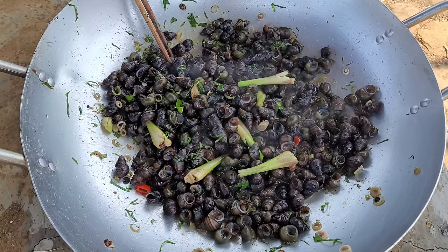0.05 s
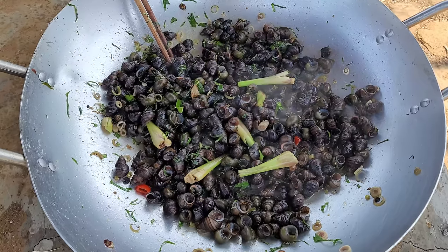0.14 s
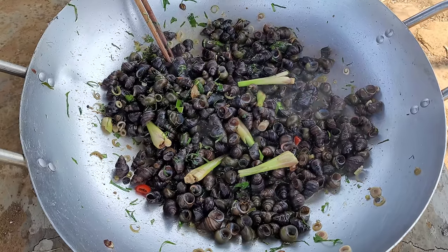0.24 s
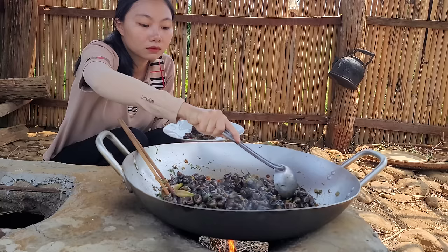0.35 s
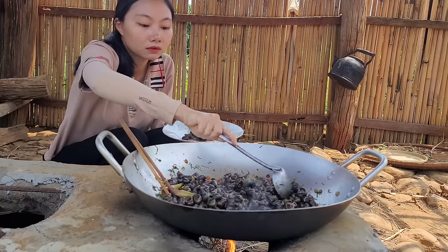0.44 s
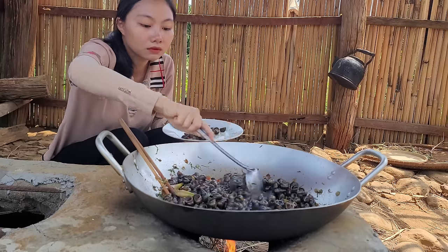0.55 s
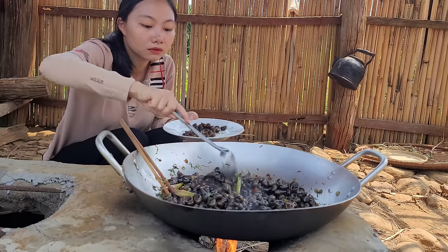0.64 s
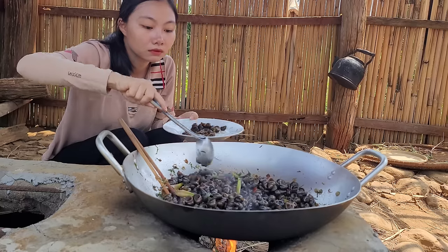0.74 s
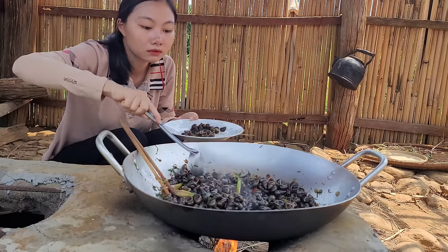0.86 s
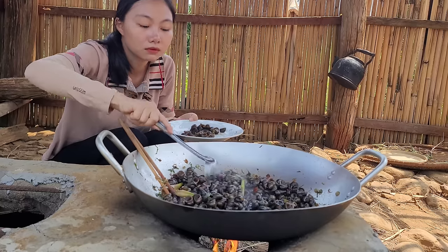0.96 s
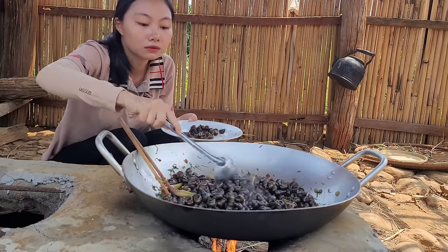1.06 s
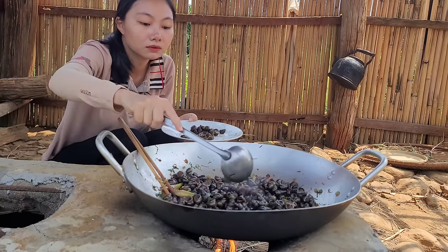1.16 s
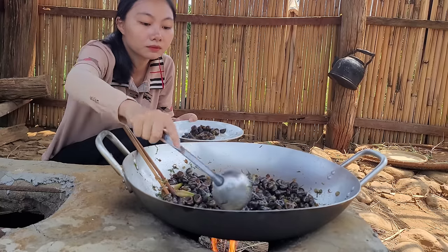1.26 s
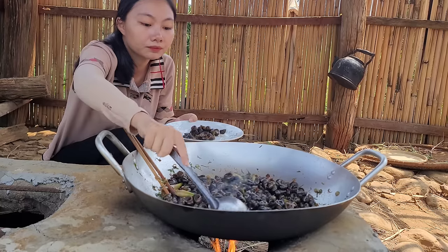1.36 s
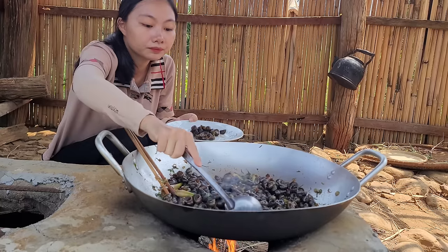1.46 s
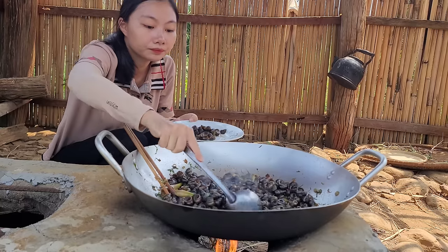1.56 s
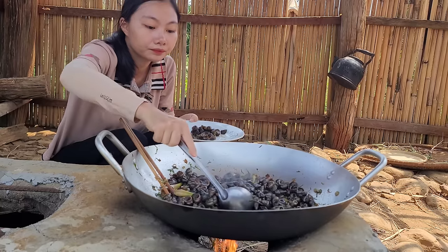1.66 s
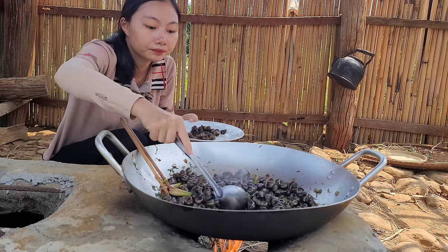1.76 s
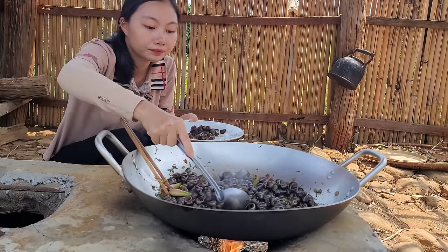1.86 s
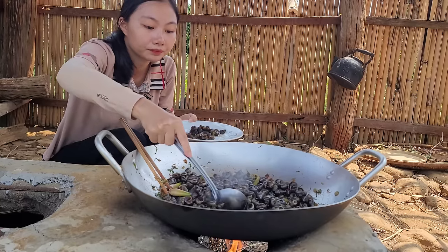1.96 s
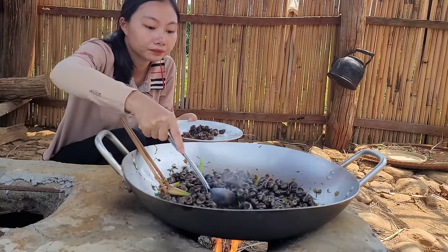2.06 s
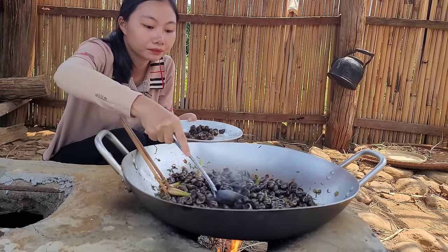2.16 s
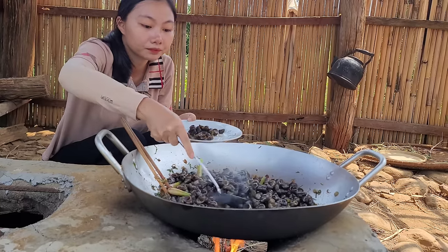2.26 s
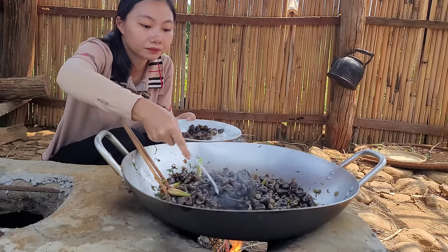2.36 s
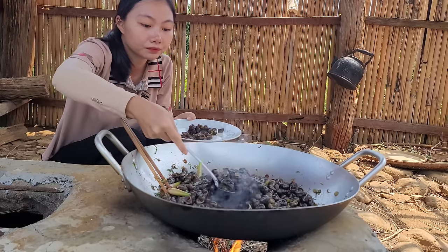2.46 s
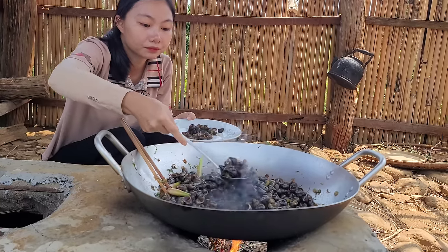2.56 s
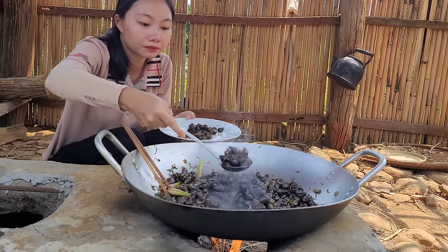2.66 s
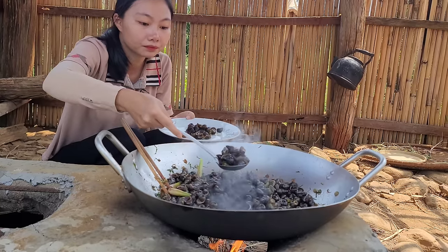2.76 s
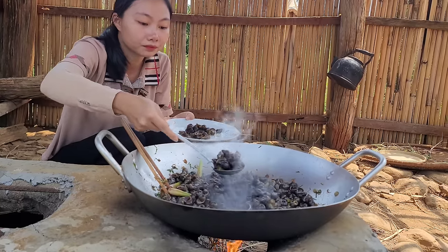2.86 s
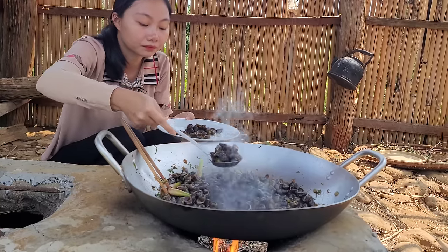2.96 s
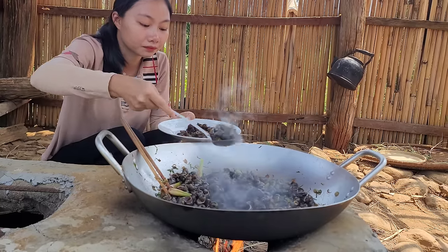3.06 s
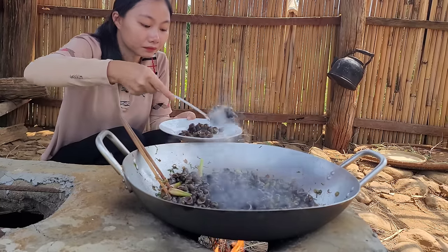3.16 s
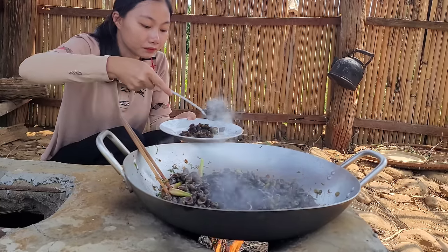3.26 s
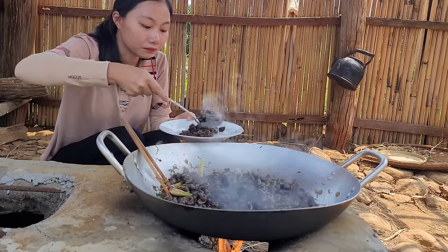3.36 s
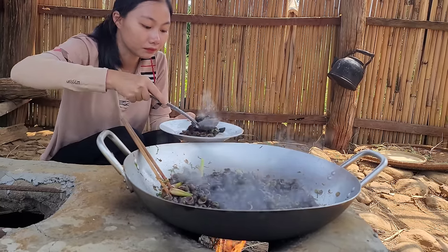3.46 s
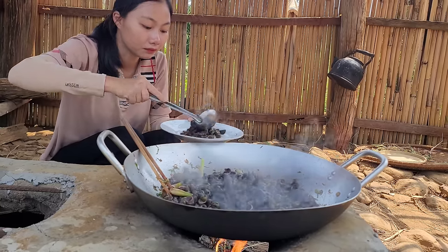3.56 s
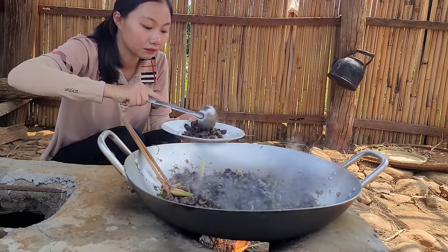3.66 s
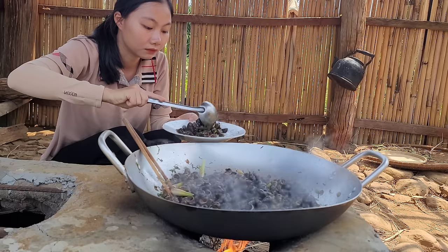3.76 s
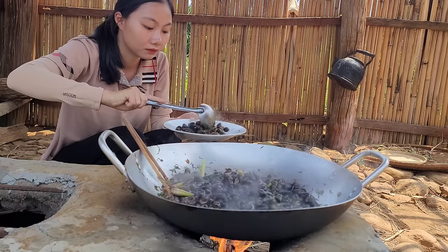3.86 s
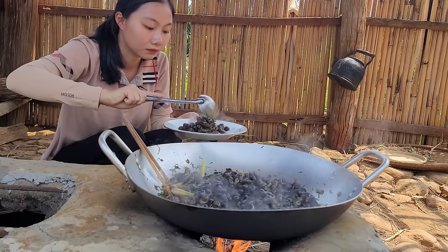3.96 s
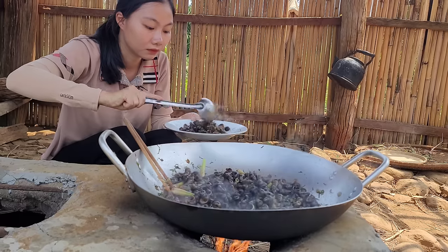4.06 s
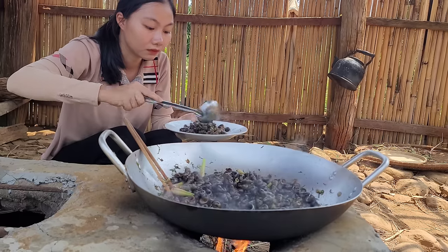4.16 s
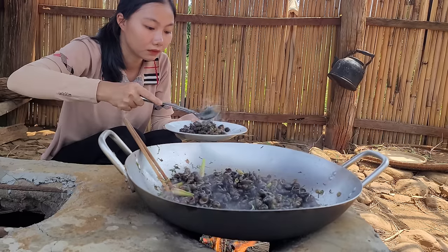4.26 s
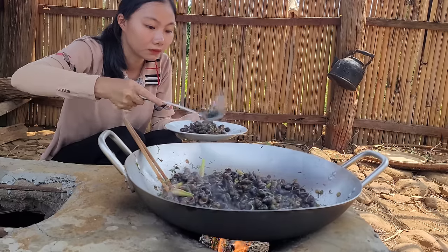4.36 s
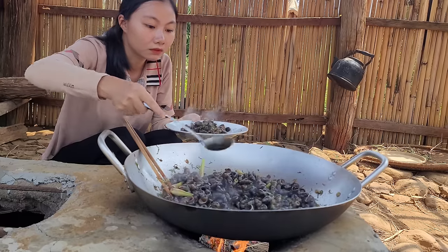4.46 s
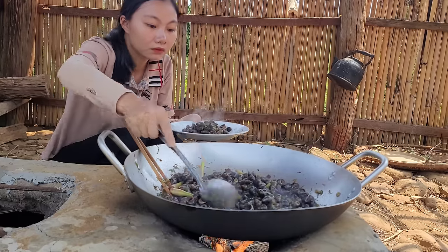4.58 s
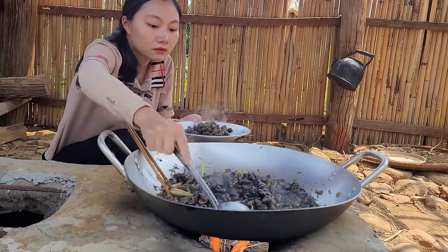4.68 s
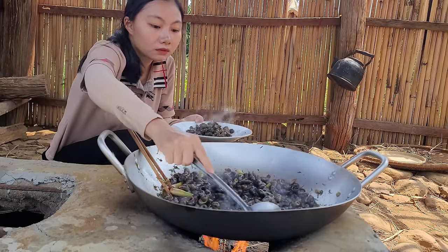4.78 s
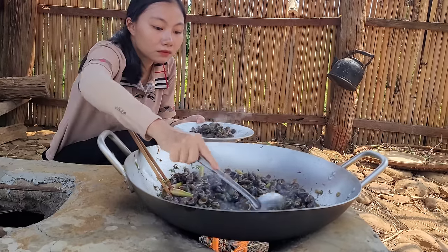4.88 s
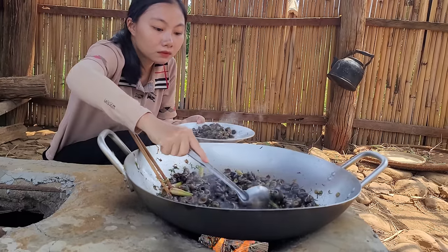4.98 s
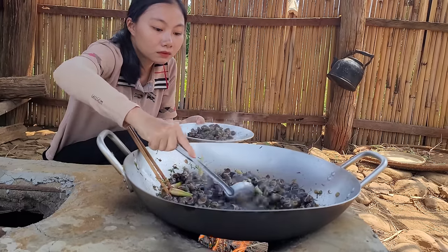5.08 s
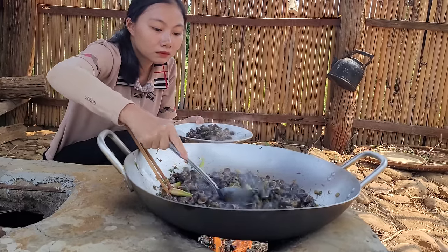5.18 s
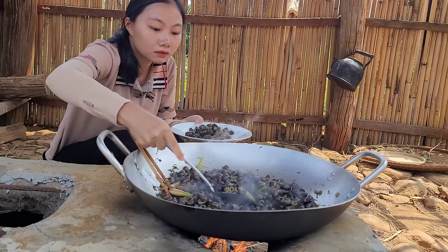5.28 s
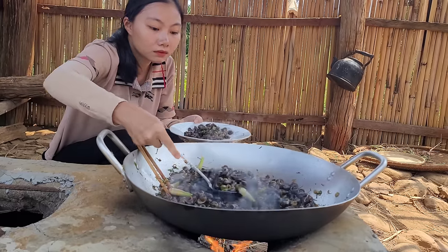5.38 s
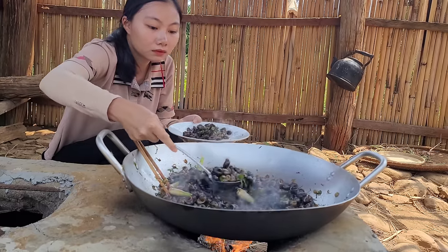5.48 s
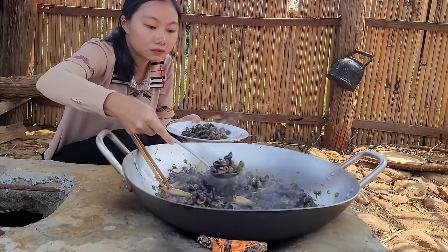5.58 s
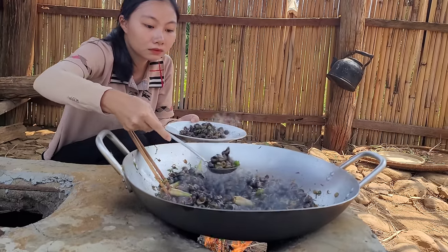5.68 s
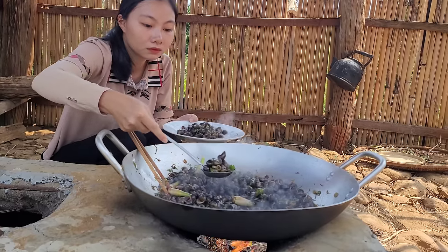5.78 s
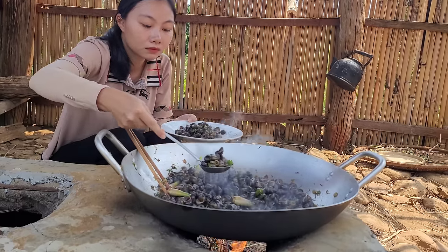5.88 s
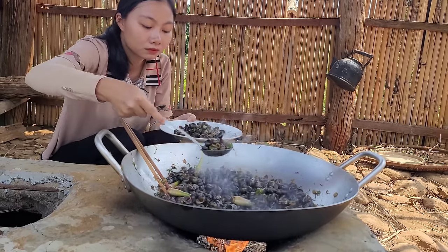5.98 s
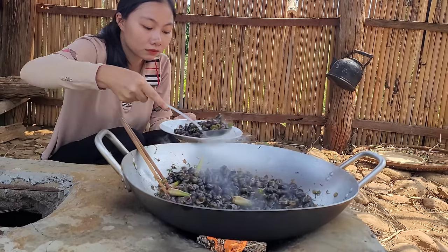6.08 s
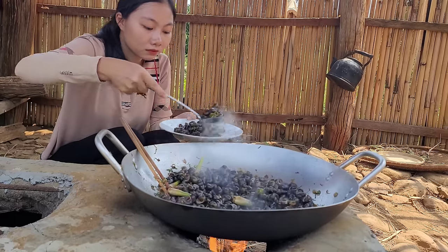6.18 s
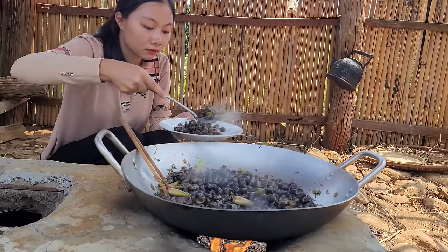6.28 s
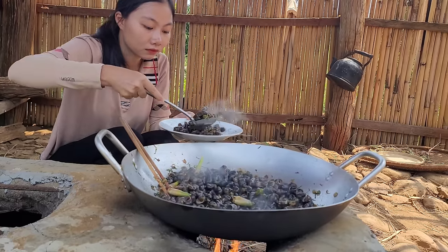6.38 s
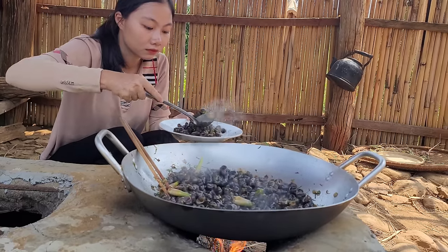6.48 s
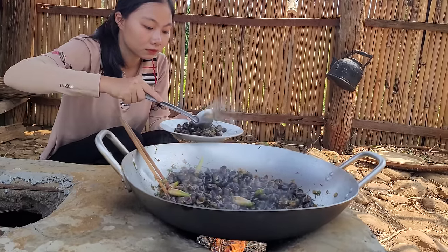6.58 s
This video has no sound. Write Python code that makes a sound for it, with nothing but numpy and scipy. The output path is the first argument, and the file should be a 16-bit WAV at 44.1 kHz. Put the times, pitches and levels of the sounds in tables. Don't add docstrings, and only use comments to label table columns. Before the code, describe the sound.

A handheld stereo recorder in a fenced yard hears a wok's fine sizzle over a low wood-fire rumble throughout; the right side is open and bright, the left shadowed and dull. From 0 to 0.5 s it is close over the wok, with only simmering and soft handling thumps. At about 0.5 s the view draws back and a ladle digs in: sharp, dry shell knocks on loaded steel, loudest around 0.9 s, amid dense rattling. More pushing and ladle thuds continue to 1.9 s, then lifting clacks until nearly 3 s. The sizzle swells slightly. After a brief gap, shells land on a glazed plate from 3.5 to 4.2 s, with small ceramic clinks, cracks and rebounds. From 4.8 to 5.9 s the ladle digs again, rattling and knocking, strongest near 5.25 s. Sizzle remains, then a few lighter plate clinks at 6.4 to 6.6 s.

```python
import sys
import numpy as np
from scipy import signal
from scipy.fft import rfft, irfft
from scipy.io import wavfile
from scipy.ndimage import uniform_filter1d

SR = 44100
rng = np.random.default_rng(int(sys.argv[2]) if len(sys.argv) > 2 else 0)


def transcribe(u):
    v = np.clip(np.atleast_2d(u).T, -1, 1)
    q = np.round(v * 32767).astype(np.int16)
    wavfile.write(sys.argv[1], SR, q)


def magnitude_from_level(level_db):
    exponent = np.asarray(level_db, float) / 20
    return 10 ** exponent


N = 292383

MOVE_S = 0.498
# (frequency [Hz], level [dB])
WOK_COLOUR = [(150, -7), (300, -30), (600, -16.5), (1050, -3), (1600, -6), (2050, -4), (3500, -3.5),
              (4600, 0), (5700, -6), (6400, -2.5), (8000, -9), (9300, -4), (10800, -10), (13000, -7.5),
              (15300, -28)]
# (frequency [Hz], level [dB], t60 [s])
LADLE_MODES = [(4290, -29, 0.01), (4590, -0.5, 0.03), (4675, 6, 0.049), (6320, 12, 0.016),
               (6410, -0.5, 0.035), (9060, -2, 0.068)]


def at_hz(points, hz):
    table_hz, values = np.array(points)[:, 0], np.array(points)[:, 1]
    return np.interp(np.log(hz), np.log(table_hz), values)


def colour(x, points):
    size = 4096
    hz = np.maximum(np.arange(size // 2 + 1) * SR / size, 1)
    cepstrum = irfft(np.log(magnitude_from_level(at_hz(points, hz))))
    cepstrum[1:size // 2] *= 2
    cepstrum[size // 2 + 1:] = 0
    return signal.oaconvolve(x, irfft(np.exp(rfft(cepstrum))))[:N]


def butter(x, order, hz, kind="low"):
    return signal.sosfilt(signal.butter(order, hz, kind, fs=SR, output="sos"), x)


def drift(rate_hz):
    slow = rng.standard_normal(int(N / SR * rate_hz) + 2)
    return np.interp(np.arange(N) / SR * rate_hz, np.arange(len(slow)), slow)


def fade_in(at_s, length_s):
    return np.clip((np.arange(N) / SR - at_s) / length_s + .5, 0, 1)


def ring(clicks, hz, t60):
    r = magnitude_from_level(-60 / (t60 * SR))
    w = 2 * np.pi * min(hz, .45 * SR) / SR
    return signal.lfilter([np.sin(w)], [1, -2 * r * np.cos(w), r * r], clicks + 1e-18)


def strikes(times, gains):
    out = np.zeros(N)
    np.add.at(out, np.clip((np.asarray(times) * SR).astype(int), 0, N - 1), gains)
    return out


def fire():
    # (time [s], level [dB])
    swell = [
        (0, 1.5),
        (2.9, 2.36),
        (4.7, 0.5),
        (6.1, 1.5),
    ]
    # (frequency [Hz], density [dB per Hz])
    left_colour = [(30, -85.5), (60, -70.5), (160, -75), (330, -89), (600, -88.5), (1040, -79), (1500, -92),
                   (2050, -85), (2500, -93), (3600, -94.5), (4400, -110.4), (5200, -107.5), (8000, -129.4),
                   (15000, -115.6)]
    # (frequency [Hz], density [dB per Hz])
    right_colour = [(30, -79), (60, -77), (160, -74.5), (330, -92), (1000, -87), (1300, -96.5), (2050, -89),
                    (2500, -93), (3300, -86.5), (5600, -94.5), (6200, -91.5), (8200, -99), (9300, -93),
                    (15000, -101.0)]
    # (frequency [Hz], density [dB per Hz])
    close_colour = [(30, -76), (100, -71), (200, -75), (330, -87.5), (800, -94.5), (1750, -85.5),
                    (2400, -94), (3500, -79), (4500, -97.5), (6000, -100.1), (7200, -109.3),
                    (11500, -109.8), (14500, -102.1), (15500, -104.4)]

    white = rng.standard_normal((3, N)) * np.sqrt(SR / 2)
    pop_sizes = magnitude_from_level(3.5 * np.minimum(rng.exponential(1, (3, N)), 3))
    pops = (rng.random((3, N)) < 900 / SR) * pop_sizes
    white = white * (1 + .7 * pops)
    flicker_db = .6 * drift(14.0)
    white *= magnitude_from_level(flicker_db + np.interp(np.arange(N) / SR, *np.transpose(swell)))

    shared = butter(white[0], 1, 600)
    right = white[1] + shared - 0.4 * butter(white[1], 1, [120, 700], "band")
    moved = fade_in(MOVE_S, 0.034)
    close_left = colour(white[2], [(30, 11.0), (100, -10.0), (330, 7), (700, -2.0), (1040, 2.5),
                                   (1500, 9.5), (2200, 7.5)])
    close_left = 0.45 * close_left + 0.87 * magnitude_from_level(3.5) * shared
    left = colour((1 - moved) * close_left + moved * white[0], left_colour)
    right = (1 - moved) * colour(right, close_colour) + moved * colour(right, right_colour)
    return np.array([left, right])


def bumps():
    # (time [s], peak [dB], pitch [Hz], rub [dB])
    handling = [
        (.003, -32.5, 109, -30.5),
        (.018, -33, 149, -29),
        (0.035, -30, 98, -38),
        (0.218, -32.5, 183, -34.5),
        (0.444, -32.5, 76.5, -29),
        (0.501, -41, 117, -36),
    ]
    out = np.zeros(N)
    rub = signal.lfilter([.3], [1, -.85], rng.standard_normal(360)) * np.hanning(360)
    for s, level_db, hz, rub_db in handling:
        press = ring(strikes([s], magnitude_from_level(level_db)), hz, 6.3 / hz)
        out += ring(press, hz, 3.6 / hz) * hz * 0.00018
        out += signal.oaconvolve(strikes([s], magnitude_from_level(rub_db + 1.5)), rub)[:N]
    return butter(out, 2, 2200) * magnitude_from_level([[0], [-7]])


def rattle(per_s=1900, uneven_db=2.5, cycles=19, count=48):
    # (time [s], stirring [dB], depth: how much duller the buried shells sound [dB])
    scoops = [
        [(0.47, -63, 7), (0.56, -37, -8), (0.676, -40, -20), (0.768, -52, -23), (0.924, -54, 15.5),
         (1.022, -35.5, -16.5), (1.16, -52.5, -11)],
        [(1.25, -48.5, -6), (1.398, -58.5, 2), (1.496, -38.5, -7), (1.584, -43, -6.5), (1.668, -44, -2.5),
         (1.796, -49.5, -1), (1.9, -65, 7)],
        [(1.98, -59.5, 7), (2.078, -44.5, -4.5), (2.224, -43, -4), (2.388, -52.5, 0), (2.73, -47, -6.5),
         (2.97, -63, -12)],
        [(4.74, -81, 9), (4.844, -44.5, -15), (5.008, -43.5, -6), (5.1, -39.5, -5), (5.256, -45, -8),
         (5.418, -54.5, -2), (5.684, -44.5, -16), (5.82, -56.5, 4), (5.96, -52.5, -25)],
    ]
    wall_db, wall_per_depth = -3, 1

    t, levels = np.arange(N) / SR, np.full((3, N), -100.)
    for stroke in scoops:
        s, stir_db, depth_db = np.transpose(stroke)
        columns = stir_db, stir_db + depth_db, stir_db + wall_db + wall_per_depth * depth_db
        stroke_db = np.array([np.interp(t, s, column) for column in columns])
        edge_db = 30 * np.clip(1 - np.minimum(t - s[0], s[-1] - t) / 0.013, 0, 2)
        levels = np.maximum(levels, stroke_db - edge_db)

    sizes = magnitude_from_level(uneven_db * np.minimum(rng.exponential(1, N), 4)) * rng.choice([-1, 1], N)
    clicks = sizes * (rng.random(N) < per_s * magnitude_from_level(3 * drift(40.0)) / SR)
    dealt = rng.integers(0, 3, N)
    groups = np.zeros((3, N))
    for k, hz in enumerate(np.geomspace(170, 15300, count)):
        mode_db = at_hz(WOK_COLOUR, hz) + 7.2 * np.log10(hz / 4000) + 4.6 * drift(18.0)
        group = int(hz < 2300) + int(hz < 550)
        groups[group] += magnitude_from_level(mode_db) * ring(clicks * (dealt == k % 3), hz, cycles / hz)
    groups[0] += sum(magnitude_from_level(mode_db - 35) * ring(clicks, hz, t60) for hz, mode_db, t60 in LADLE_MODES)
    groups /= np.std(groups, axis=1, keepdims=True)
    return np.sum(groups * magnitude_from_level(levels + [[4], [-1.5], [-4]]), axis=0)


def knocks(count=140, length=1200):
    # (time [s], peak [dB],
    # weight: 1 kHz re peak [dB], hardness: 12 kHz re peak [dB], pitch [Hz])
    spill = [(0.5487, -24.5, -15, -16, 4860), (0.5865, -20.5, -15, -10, 4800), (0.623, -27.5, -5, -6, 4630),
             (0.6604, -31, -12, -20, 1840), (0.6928, -29, -14, -22, 2020), (0.7348, -33, -10, -13, 4860),
             (0.7776, -29, -12, -26, 4870), (0.7958, -25, -10, -28, 4870), (0.8231, -28.5, -18, -28, 4860),
             (0.8593, -27, -12, -24, 4830), (0.8761, -17, -11.5, -24, 4760), (0.8836, -16, -26, -19, 4700),
             (0.9086, -13.5, -21, -12.5, 4630), (0.9204, -14.5, -16, -21, 4700),
             (0.961, -26, -15, -8, 4670), (0.9675, -18, -29, -9.5, 4700), (1.0627, -20, -19, -20, 4440),
             (1.142, -28.5, -11, -17, 6600), (1.1667, -32, -14, -24, 4600),
             (1.2374, -28.5, -5.5, -27, 4560), (1.292, -20, -16, -21, 2100), (1.333, -17.5, -24, -11, 6300),
             (1.5245, -27.5, -15, -17, 4590), (1.5469, -23, -14, -21, 4430), (1.6786, -26, -18, -18, 2920),
             (1.8181, -27.5, -14, -15, 4540)]
    lift = [(2.0433, -35, -9, -19, 2310), (2.1206, -24.5, -10, -24, 4380), (2.14, -20, -16, -21.5, 2820),
            (2.2425, -26.5, -10, -16, 4870), (2.2882, -20, -14, -19, 3200), (2.3258, -19.5, -14, -24, 2110),
            (2.392, -31, -12, -20, 4560), (2.5845, -31, -3, -16, 2160), (2.6024, -28, -11, -20, 4500),
            (2.6148, -24.5, -7, -13, 2010), (2.6611, -18, -14.5, -13.5, 4840), (2.7203, -36, -5, -20, 4610),
            (2.7593, -36, -8, -7, 4470), (2.7833, -29, -15, -16, 4730), (2.807, -33, -11, -17, 2020),
            (2.8863, -32, -9, -23, 4700)]
    dig = [(4.798, -37, -16, -14, 2080), (4.8209, -39, -10, -18, 4120), (4.8329, -37, -17, -20, 4100),
           (4.8465, -34, -15, -21, 2170), (4.8693, -23.5, -14, -22, 2880), (4.8818, -25, -20, -19, 4600),
           (4.8968, -23, -16, -14, 6300), (4.9242, -28, -11, -21, 4640), (4.9525, -30, -6, -14, 4630),
           (4.9831, -27.5, -16, -12, 4810), (5.0876, -31, -4, -21, 2230), (5.1022, -24, -10, -17, 2160),
           (5.1598, -29, -8, -21, 6230), (5.1761, -28.5, -15, -13, 4110), (5.225, -25.5, -8, -23, 2120),
           (5.254, -14.5, -12, -23, 4200), (5.3346, -22.5, -13.5, -17, 4520), (5.366, -30, -14, -13, 4500),
           (5.4075, -23, -5, -34, 2120), (5.435, -29.5, -13, -27, 3180), (5.507, -27, -16, -14, 3980),
           (5.5458, -31, -17, -26.5, 4640), (5.6033, -34.5, -12, -19, 1990),
           (5.6373, -23.5, -17, -21, 2000), (5.675, -20.5, -17, -20, 4650), (5.6947, -20, -8, -20, 4700),
           (5.7332, -27, -13, -17, 2360), (5.885, -31, -13, -23, 4570)]
    # (time [s], peak [dB], weight [dB], hardness [dB])
    light_ticks = [(.5308, -34, -20, -12), (0.713, -39, -12, -18), (.7648, -32, -14, -16),
                   (0.931, -25, -15, -18), (.979, -31, -5, -18), (1.8918, -42, -8, -18),
                   (1.9967, -46, -16, -20), (2.027, -44, -10, -18), (2.1966, -43, -8, -16),
                   (2.207, -35, -13, -16), (2.4973, -46, -10, -11), (2.548, -50, -10, -16),
                   (2.9369, -40, -10, -17), (4.942, -34, -14, -18), (4.962, -31, -19, -14),
                   (5.02, -33.5, -14, -20), (5.0787, -32.5, -10, -20), (5.183, -32.5, -4, -10),
                   (5.2128, -34, -16, -21), (5.2489, -30, -20, -14), (5.2926, -37, -13, -10),
                   (5.311, -40, -11, -10), (5.386, -34, -6, -18), (5.482, -45, -14, -10),
                   (5.5, -37, -12, -16), (5.5894, -37.5, -17, -21), (5.62, -38, -9, -12),
                   (5.65, -37, -12, -14), (5.781, -46, -14, -13)]
    # (time [s], peak [dB], pitch [Hz], weight: 1 kHz re peak [dB])
    thuds = [(0.49, -31, 300, -8.5), (0.938, -19.5, 1060, -10), (1.381, -47.5, 1050, 16),
             (1.412, -31.5, 330, 2), (1.466, -18, 1060, -9), (1.6372, -28.5, 1020, -5.5),
             (1.645, -34.5, 620, 3.5), (1.655, -40, 220, 9), (1.665, -38, 620, 11.5),
             (1.797, -29.5, 1000, -8), (4.7715, -38, 2100, 6)]
    tick_hz = 4750
    shell_thud_db = -21
    ladle_thud_db, ladle_hard_db = 6.5, -15.5
    pitch_db, pitch_octaves = 5.5, 0.17

    contacts = [(*row, shell_thud_db) for row in spill + lift + dig]
    contacts += [(*row, tick_hz, shell_thud_db) for row in light_ticks]
    contacts += [(s, db, weight, ladle_hard_db, hz, weight + ladle_thud_db) for s, db, hz, weight in thuds]
    s, level_db, weight_db, hard_db, pitch_hz, thud_db = np.transpose(contacts)[:, :, None]

    luck, place = rng.standard_normal((len(s), count)), rng.random((len(s), count))
    hz = 170 * (15400 / 170) ** (((np.arange(count) + place) / count) ** .75)
    low = np.clip(np.log2((2500 / hz) ** 1.6), 0, 1)
    high = np.clip(np.log2(hz / 6500), 0, 1)
    deep = np.clip(np.log2(800 / hz), 0, 1)
    tilt_db = (low - deep) * (weight_db + 11.5) + high * (hard_db + 19.0) + deep * (thud_db + 25.0)
    tilt_db = tilt_db + pitch_db * np.exp(-(np.log2(hz / pitch_hz) / pitch_octaves) ** 2)
    mode_db = at_hz(WOK_COLOUR, hz) + 7.66 * np.log10(hz / 4000) + 2.54 * np.abs(luck)
    gain = np.sign(luck) * magnitude_from_level(level_db + tilt_db + mode_db - 13.5)
    t60 = 0.016 * (4000 / hz) ** 0.13

    late = .0013 * rng.exponential(1, (len(s), count, 1)) ** 1.5 - .0003
    turning = 2 * np.pi * hz[:, :, None]
    decay = np.log(1000) / t60[:, :, None]
    starts = (s[:, 0] * SR).astype(int) - 40
    settings = [v.astype(np.float32) for v in (gain, turning, decay, late + 40 / SR)]
    t, out = np.arange(length, dtype=np.float32) / np.float32(SR), np.zeros(N + length)
    for at, g, f, d, wait in zip(starts, *settings):
        age = np.maximum(t - wait, 0)
        out[at:at + length] += g @ (np.sin(f * age) * np.exp(-d * age))

    bowl_db = (level_db - 17 - .4 * np.maximum(weight_db + 14, 0))[:, 0]
    for k, (f, ladle_db, ladle_t60) in enumerate(LADLE_MODES):
        out[:N] += ring(strikes(s[:, 0], luck[:, k] * magnitude_from_level(bowl_db + ladle_db)), f, ladle_t60)
    return out[:N]


def plate(second_s=.0092):
    # (time [s], peak [dB], crack re ring [dB], rim modes re centre modes [dB],
    # bare-glaze modes re centre modes [dB])
    landings = [(3.473, -27.5, -1, -6, 2), (3.5716, -36, -6, -11, -5), (3.583, -26.5, -1.5, -20, 6),
                (3.625, -40, 1, -17, 8), (3.659, -41, -1, -20, 3), (3.7377, -27.5, -4, -23, -6),
                (3.7687, -24.5, -5, -22, -10), (3.7998, -34, -1, -18, -10), (3.8154, -36, 8.5, -18, 3),
                (3.829, -26.5, -10, -21, -4), (3.855, -31, 4, -22, -3), (3.8624, -24, -8, -34, -8),
                (3.8743, -37, -15, -24, -8), (3.914, -36.5, 5, -28, -6), (3.9217, -35, -5, -24, -10),
                (3.955, -29, -5, -22, -8), (4.0567, -33, 1.5, -12, -6), (4.076, -28.5, -0.5, -11.5, -1),
                (4.1643, -33.5, -14, -18, -12), (4.2243, -45.5, 6, -20, -10), (6.431, -41, -2, -22, -5),
                (6.4943, -35, 2.5, -25, -2), (6.558, -30.5, 1.5, -22, 3), (6.597, -43, 4, -17, 0)]
    # (frequency [Hz], level [dB], t60 [s], second sounding re first [dB])
    centre_modes = [(2140, -18, 0.063, -7), (3340, 0.5, 0.028, -2), (5180, -13, 0.038, 14),
                    (5320, -18, 0.047, 10), (7000, -8, 0.031, -3), (7250, -9, 0.063, 3),
                    (9020, -10.5, 0.04, 3), (9480, -1.5, 0.037, -5)]
    # (frequency [Hz], level [dB], t60 [s], second sounding re first [dB])
    rim_modes = [(2290, -16, 0.26, 0.5), (4340, -11, 0.05, -12), (6030, 5.5, 0.018, -15),
                 (6750, -1.5, .025, -19), (9020, -4, 0.044, -5), (10350, -14, 0.05, -9),
                 (11000, -14, 0.06, -5)]
    # (frequency [Hz], level [dB], t60 [s], second
    # sounding re first [dB])
    bare_modes = [(2050, -18, 0.088, -5), (3490, -7.5, 0.046, 1.5), (5550, -3, .065, -5),
                  (7420, -12, 0.068, -4), (9710, -2, 0.079, -13)]

    s, level_db, crack_db, rim_db, bare_db = np.transpose(landings)
    all_modes = centre_modes + rim_modes + bare_modes
    luck = rng.standard_normal((len(s), 2, len(all_modes)))
    luck = np.sign(luck) * magnitude_from_level(2 * np.abs(luck) - 2)

    def noise_tail(gains, t60):
        envelope = signal.lfilter([1], [1, -magnitude_from_level(-60 / (t60 * SR))], strikes(s, gains))
        return envelope * rng.standard_normal(N)

    skid = .05 * noise_tail(magnitude_from_level(level_db - 17), 0.05)
    spots = [-.5 * (rim_db + 20.0)] * len(centre_modes)
    spots += [rim_db + 12.5] * len(rim_modes) + [bare_db] * len(bare_modes)
    out = np.zeros(N)
    for k, ((hz, mode_db, t60, second_db), spot_db) in enumerate(zip(all_modes, spots)):
        gain = magnitude_from_level(level_db + mode_db - 9.5 + spot_db)
        clicks = strikes(s, gain * luck[:, 0, k])
        clicks += strikes(s + second_s, gain * magnitude_from_level(second_db) * luck[:, 1, k])
        skid_db = mode_db - 5.9 * (k >= len(centre_modes))
        out += ring(clicks + magnitude_from_level(skid_db) * skid, hz, t60)
    crack = noise_tail(magnitude_from_level(level_db + crack_db), 0.048)
    return out + colour(crack, [(800, -16), (2500, -1.5), (6000, 1.0), (8200, -9), (11000, -8), (15000, -12)])


def yard(x, near_db=-29, wall_db=-22.0, wall_s=0.012, t60=0.053):
    t = np.arange(6000) / SR
    rim_scatter = magnitude_from_level(near_db - 60 * t / 0.013)
    fence = magnitude_from_level(wall_db - 60 * t / t60) * np.clip(t / wall_s, 0, 1) ** 4
    echo = (rim_scatter + fence) * rng.standard_normal((2, len(t)))
    echo[:, 64] = [.22, 1]
    echo[0] += butter(echo[1] - echo[0], 2, 1900)
    waves = rfft(echo)
    waves /= np.sqrt(uniform_filter1d(np.abs(waves) ** 2, size=30))
    x = butter(x, 2, 170, "high")
    return magnitude_from_level(1.5) * signal.oaconvolve(x[None], irfft(waves), axes=1)[:, 64:N + 64]


def left_port(x):
    # (frequency [Hz], level [dB])
    body_shadow = [(100, 0.0), (400, -2.0), (700, -3.7), (1100, 4.4), (1500, 3.2), (2100, -1.6),
                   (3000, -10.9), (4500, -18.7), (6000, -21.5), (8000, -28.4), (9500, -39.0),
                   (10500, -26.2), (12500, -19.8), (15000, -7.6)]
    lag_s, duct_hz, duct_width_hz = .00005, 2100, 437

    shade = np.array(body_shadow, float)
    shade[:, 1] += at_hz([(2500, 0), (4500, 2), (12000, 4)], shade[:, 0])
    r = np.exp(-np.pi * duct_width_hz / SR)
    poles = [1, -2 * r * np.cos(2 * np.pi * duct_hz / SR), r * r]
    x = signal.lfilter(poles[::-1], poles, colour(x, shade))
    return np.interp(np.arange(N) - lag_s * SR, np.arange(N), x)


def scene():
    left, right = yard(knocks() + rattle() + plate())
    treble = butter(left, 4, 2200, "high")
    left = left + treble * (0.86 * drift(250.0) - .4)
    return np.array([left_port(left), right]) + fire() + bumps()


def drop_weak(x, below_db=-20.5, from_hz=4000, size=1024):
    hz, _, cells = signal.stft(x, SR, nperseg=size)
    power = uniform_filter1d(np.abs(cells) ** 2, size=6, axis=1)
    loudest = power[:, (hz > 500) & (hz < 12000)].mean(axis=1).max(axis=0) ** .8 * 2e-2
    keep = (power > loudest * magnitude_from_level(2 * below_db)) | (hz[:, None] < from_hz)
    return signal.istft(cells * keep, SR, nperseg=size)[1][:, :N]


def band_limit(x):
    return signal.sosfilt(signal.butter(12, 16470, fs=SR, output="sos"), x)


def record(dry):
    settle_s = .895
    # (frequency [Hz], level [dB])
    notch = [(5000, -0.5), (7200, -8.5), (8200, -15), (9500, -30), (10300, -8.5), (12000, -6.5),
             (13200, -1.5), (14500, 2)]
    deep = [(7000, -1.0), (7700, -10), (10500, -8.0), (11500, -1.0)]
    held = (1 - fade_in(settle_s, 0.017)) * fade_in(MOVE_S, 0.045)
    right = dry[1] + held * (colour(dry[1], notch) - dry[1])
    at_first = 1 - fade_in(MOVE_S + 0.016, 0.029)
    right = right + at_first * (colour(right, deep) - right)
    top = signal.cheby2(10, 45, 16200, fs=SR, output="sos")
    wet = drop_weak(signal.sosfilt(top, [dry[0], right]))
    mix = 0.69 * np.tanh(wet / 0.68)
    return band_limit(mix)


dry = scene()
out = record(dry)
transcribe(out)
```